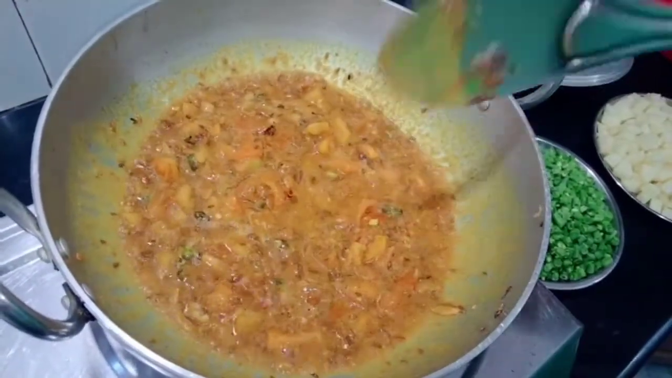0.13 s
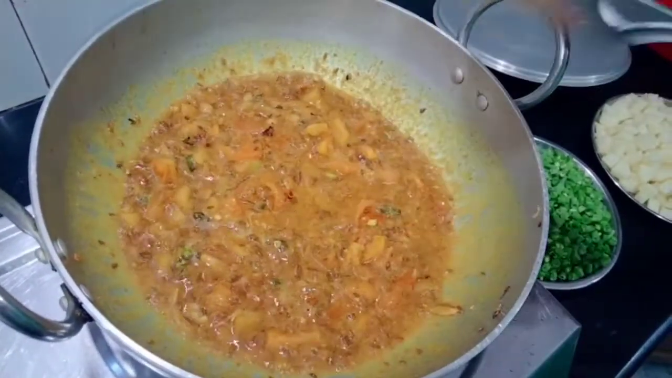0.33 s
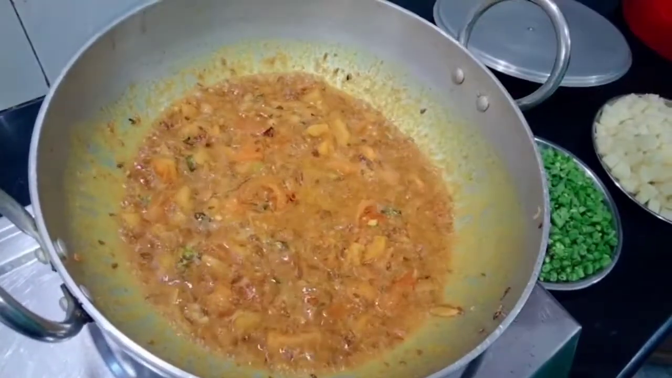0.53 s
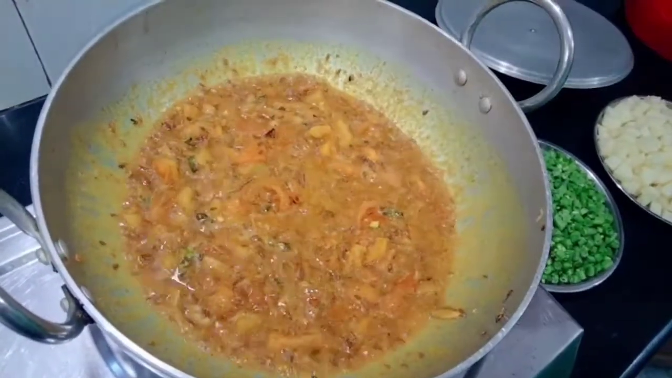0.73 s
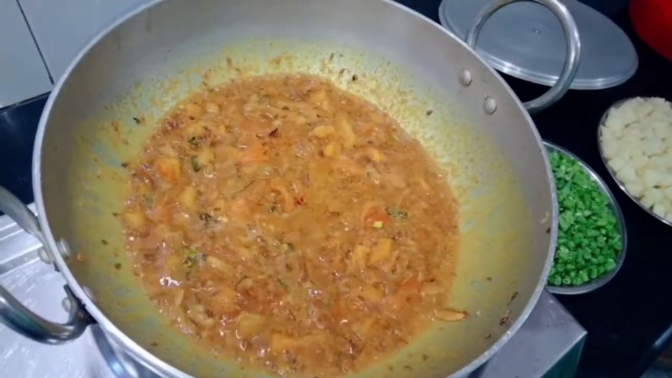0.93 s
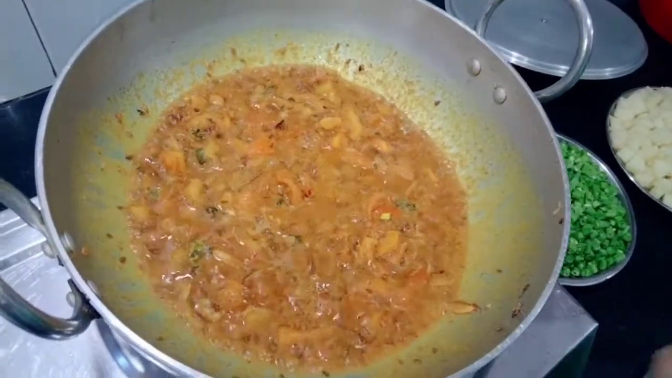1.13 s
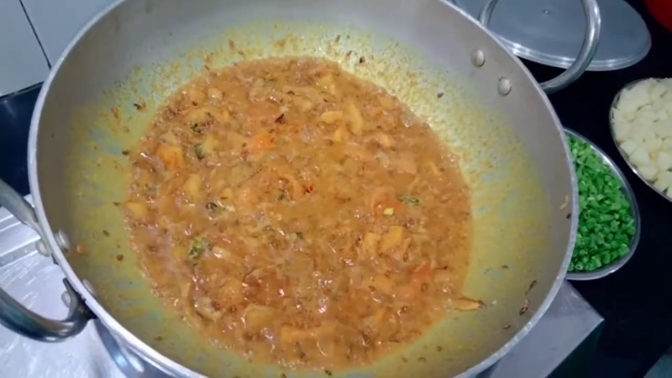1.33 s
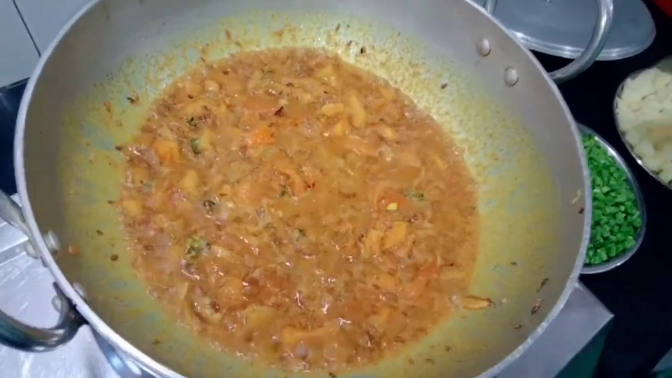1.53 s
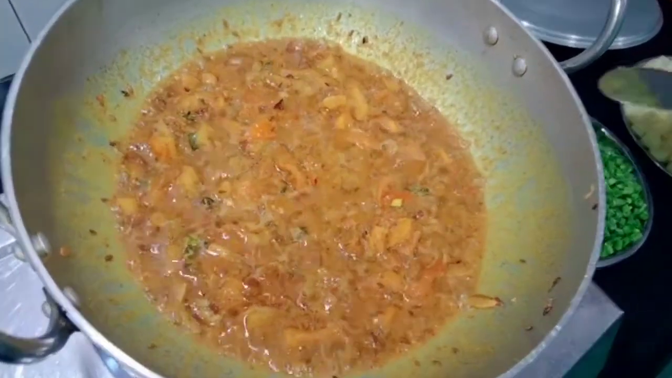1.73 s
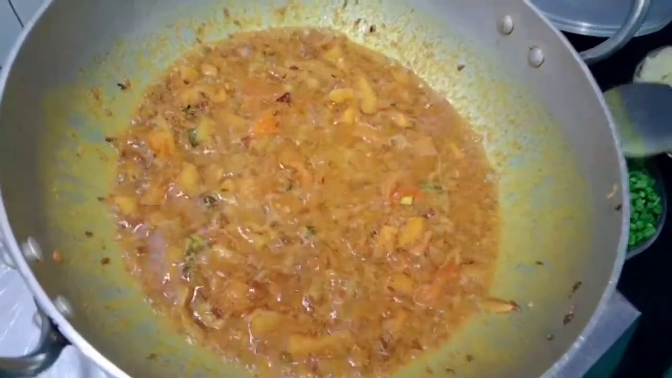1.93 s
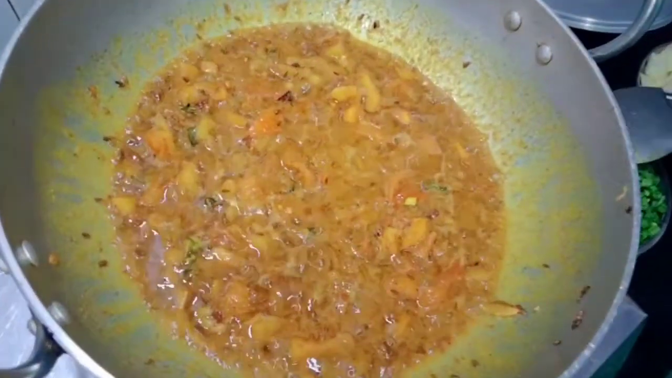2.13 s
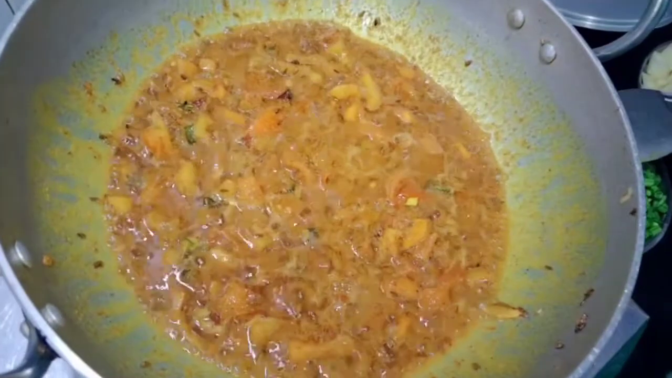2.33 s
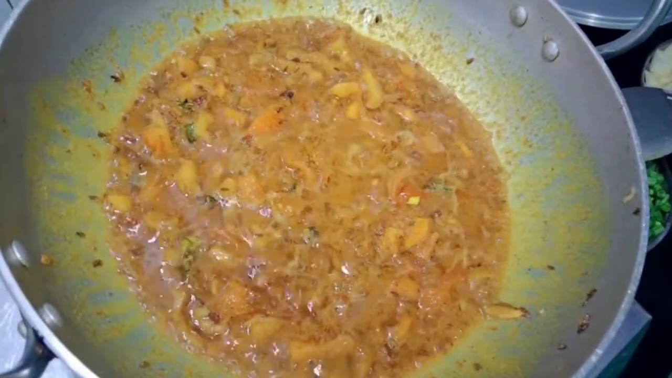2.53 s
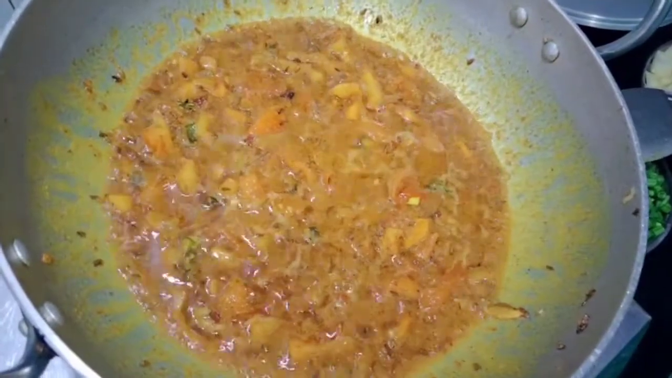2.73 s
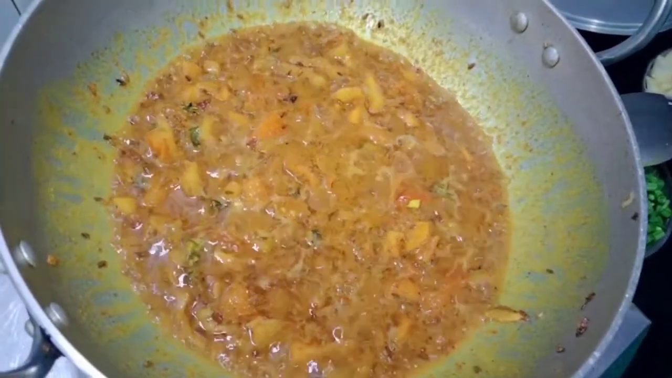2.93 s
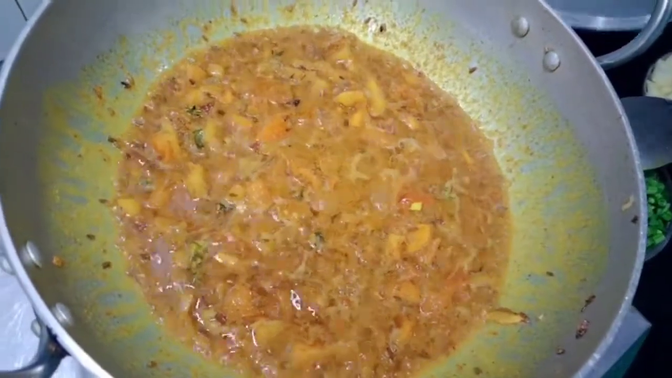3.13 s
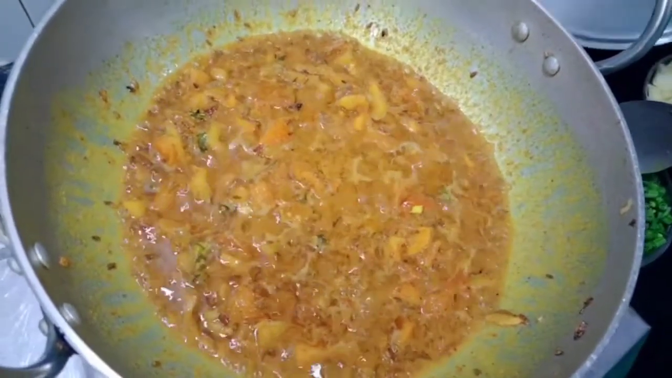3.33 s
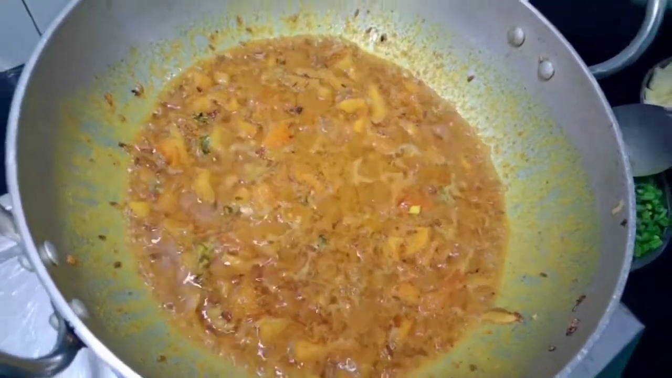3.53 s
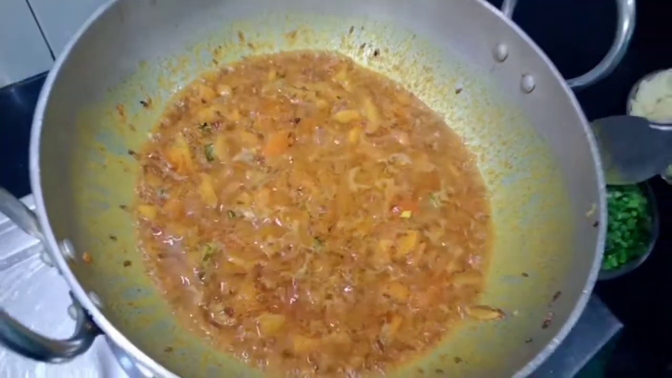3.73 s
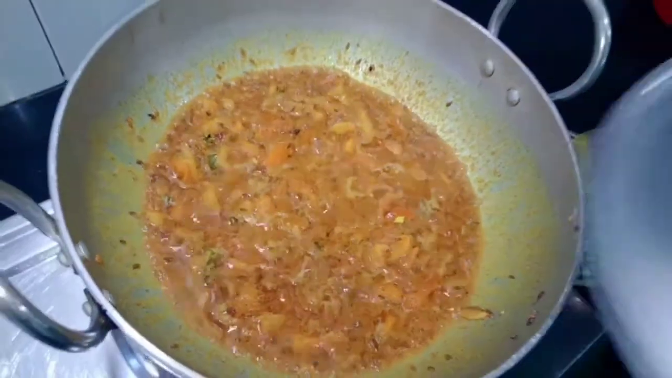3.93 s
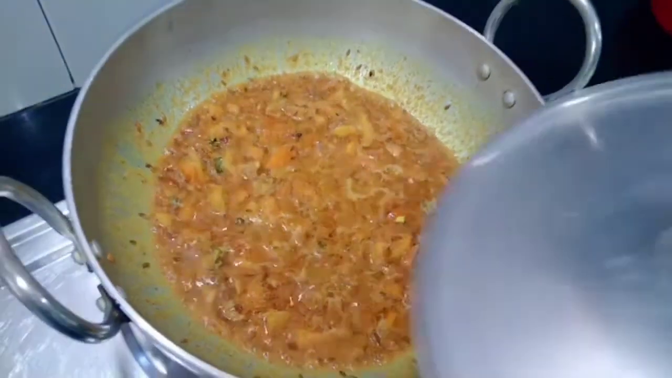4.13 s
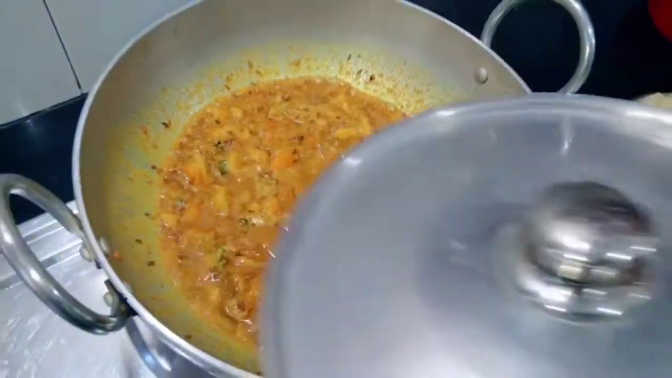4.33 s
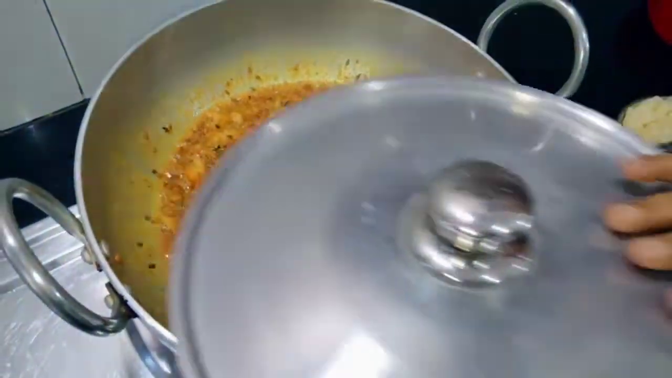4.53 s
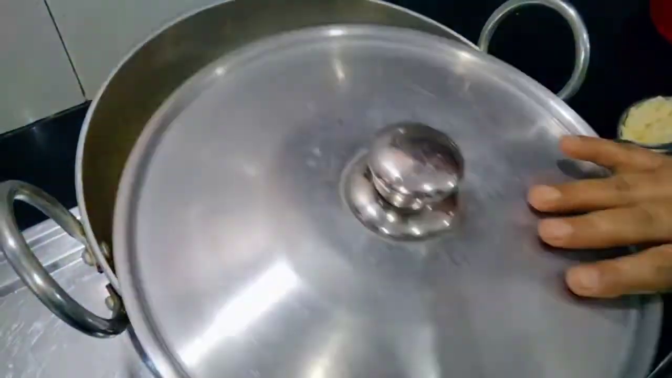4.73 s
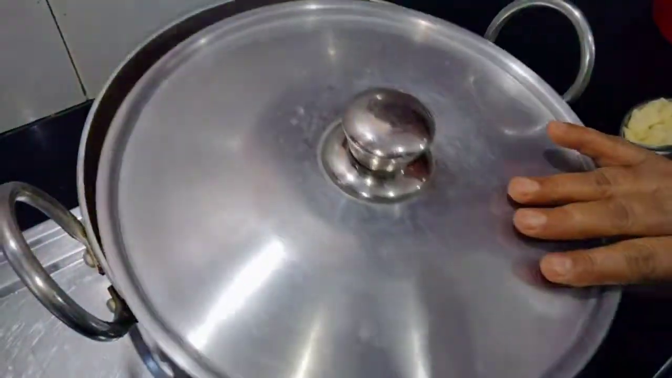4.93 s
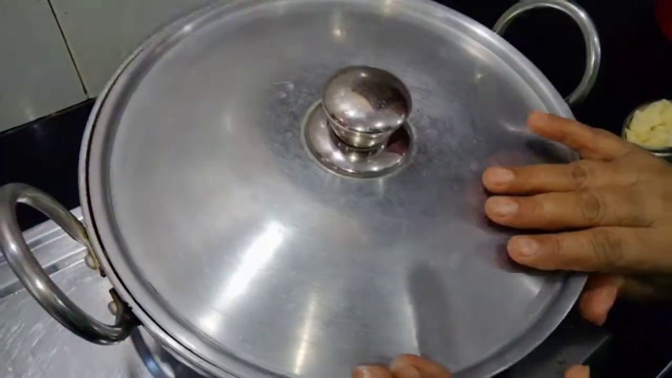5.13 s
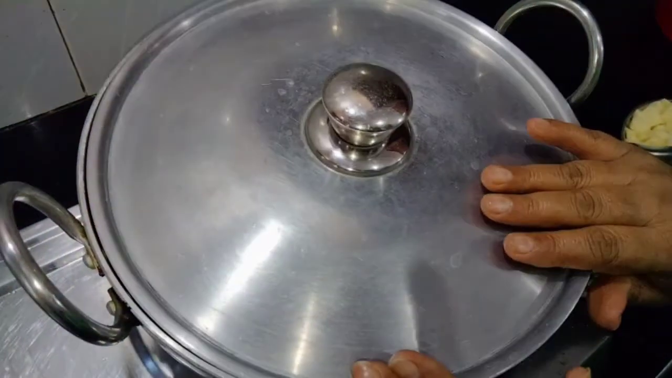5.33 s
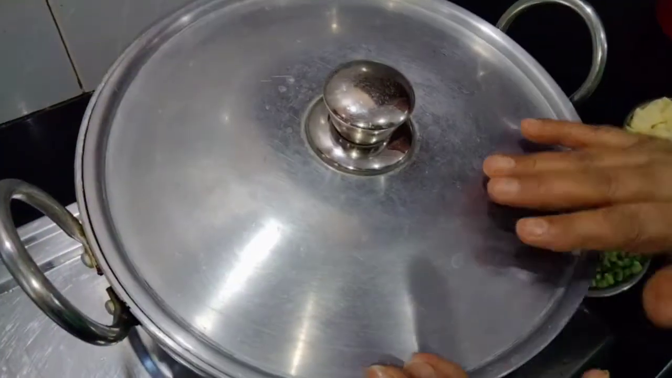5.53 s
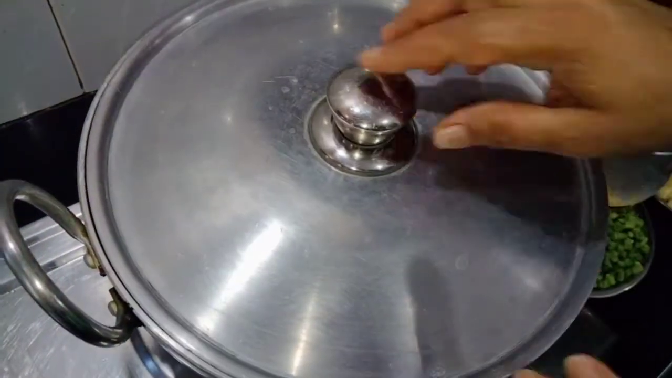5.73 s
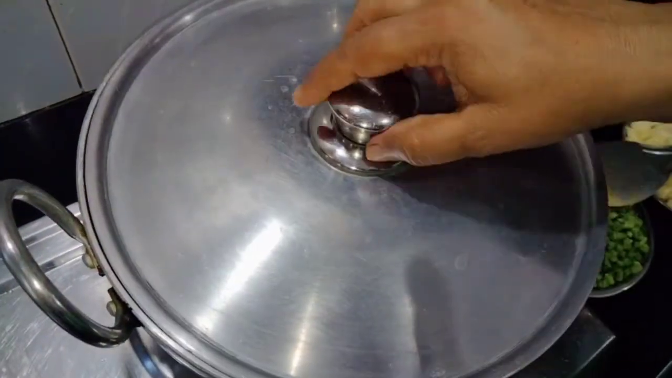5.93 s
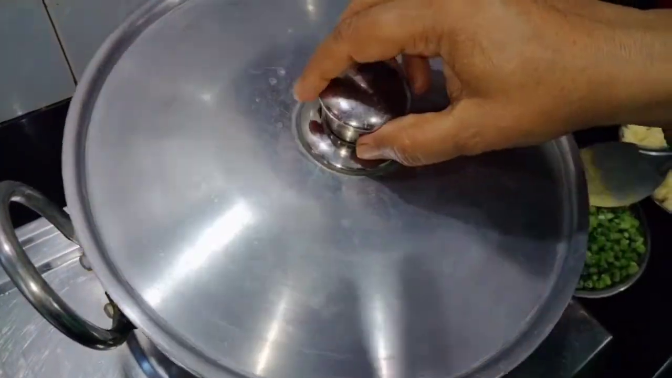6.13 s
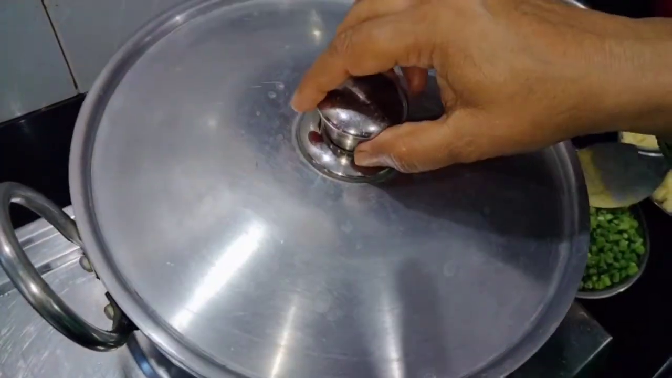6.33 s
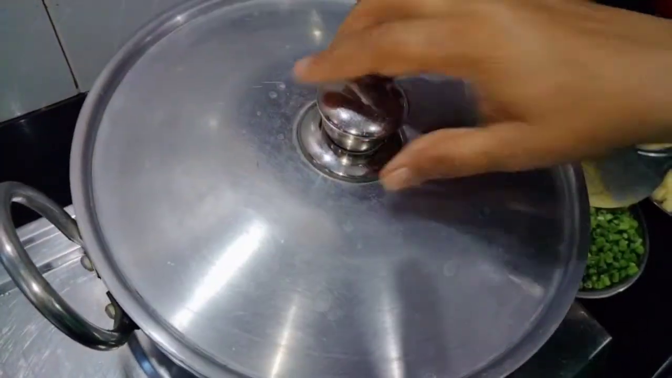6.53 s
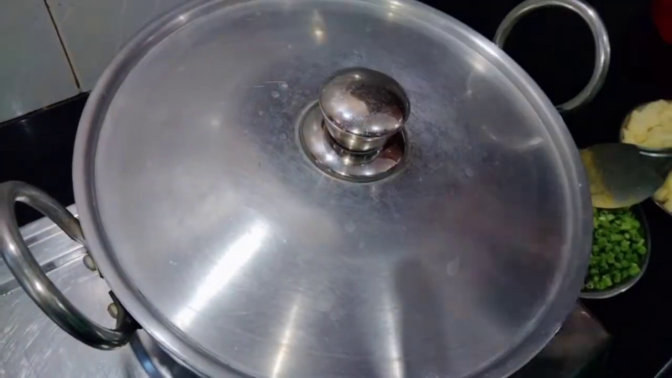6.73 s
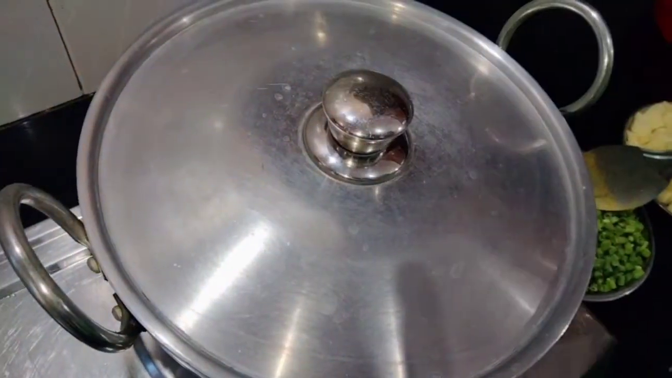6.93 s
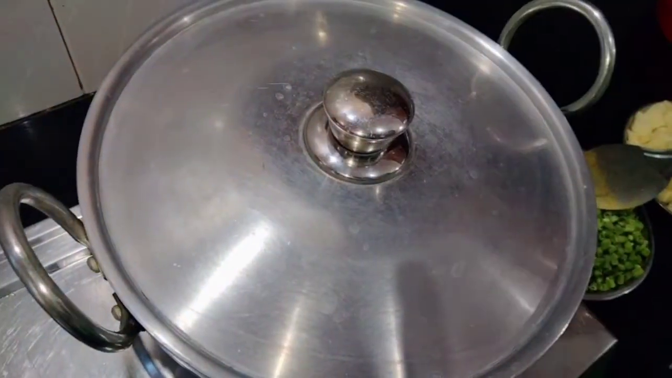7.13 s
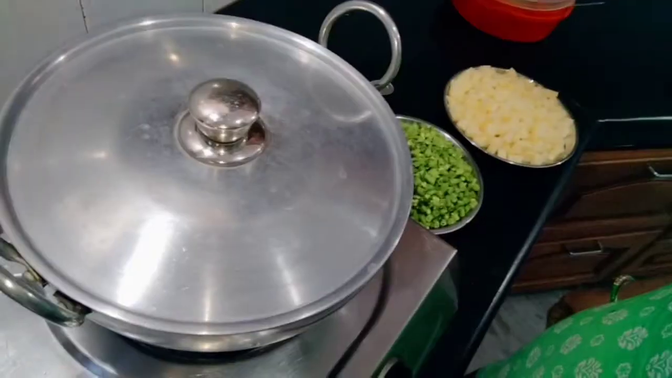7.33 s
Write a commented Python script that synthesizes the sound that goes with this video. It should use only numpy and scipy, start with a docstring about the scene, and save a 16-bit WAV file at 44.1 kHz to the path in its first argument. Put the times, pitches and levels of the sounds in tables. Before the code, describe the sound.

Close, dry kitchen sound: wet masala sizzles brightly in an open steel pan. A spoon clanks and rattles nearby. A metal lid is then picked up in a cluster of clatter and scraping, slides over with a faint hollow hum, and bangs onto the rim. The fizz turns muffled. Small ticks, more nudges and a last bright clank follow, then a short total silence before the soft sizzle returns.

```python
"""Wet spiced masala sizzles in a steel pan; a spoon clanks and rattles, then a lid is dragged over the rim,
dropped, nudged and seated, muffling the fizz. The sound drops out once near the end.
The sizzle is noise roughened by bubble pops and coloured by the lid. Blows and scrapes excite ringing steel
modes over a dense clang; trapped air hums as gliding noise, ticks and tones are fading sines,
and jolts of the microphone are deep filtered noise. Both channels carry the same mono sound."""
import sys
import numpy as np
from scipy import signal
from scipy.io import wavfile
from scipy.ndimage import uniform_filter1d

SR = 44100
rng = np.random.default_rng(int(sys.argv[2]) if len(sys.argv) > 2 else 0)


def unload_audio(sound):
    """Save the sound as a 16-bit wav file, at the path given as the first command line argument."""
    columns = np.transpose(np.atleast_2d(sound))
    # keep every value between -1 and 1, then stretch to whole-number steps
    steps = np.round(np.clip(columns, -1, 1) * 32767)
    wavfile.write(sys.argv[1], SR, steps.astype(np.int16))


N = 325968  # samples

# Fizz colour of the open pan, the lidded pan and the pan from further off.
# Each row: frequency in Hz, relative density in dB per Hz.
OPEN_COLOUR = [(18, -44), (30, -12.5), (93, -14.5), (193, -21), (238, -18.5), (662, -8), (1010, -15),
               (1310, -8.5), (2210, -19), (3940, -10), (5120, -19.5), (7580, -14.5), (9110, 0),
               (10900, -10.5), (15800, -11.5)]
LIDDED_COLOUR = [(20, -9), (120, -9.5), (300, -3), (420, -8), (800, -16.5), (1300, -15), (2000, -23),
                 (2500, -28), (3300, -25), (5400, -25.5), (7500, -19), (9600, -8.5), (11500, -23),
                 (14000, -21), (15600, -20)]
AFAR_COLOUR = [(20, -18), (55, -13), (110, -19.5), (300, -13.5), (735, -13.5), (900, -23), (1200, -9),
               (1890, -14.5), (2200, -24), (3500, -32), (3900, -20), (6000, -29.5), (8900, -10.5),
               (11500, -21), (14000, -27), (15600, -22)]
# Small broad humps and a dip in the open fizz's colour.
# Each row: centre in Hz, width in Hz, height in dB.
OPEN_RIPPLES = [(1780, 120, 4.5), (6370, 2400, 6), (3450, 380, 2.5), (9570, 820, 2.5), (13300, 1900, -3),
                (15300, 1200, 1.5)]
# Resonances of air and steel under the lid. Each row: centre in Hz, width in Hz, height in dB.
DOME_RESONANCES = [(1020, 110, 23.5), (1650, 71, 17.5), (2775, 43, 23.5), (3400, 45, 11.5),
                   (3630, 100, 13.5)]
# How far the lid covers the pan. Each row: time in seconds, share covered from 0 to 1.
LID_COVER = [(3.85, 0.1), (4.2, 0.18), (4.55, 0.42), (4.87, 0.34), (5.1, .9), (5.4, 0.82)]
FIZZ_DB, FIZZ_SAG_DB_PER_S, SHADE_DB = -34.5, -0.31, -14  # open fizz, its slow sag, loss under a shut lid
MUFFLE_POWER = 1.2  # the colour turns muffled later than the level falls
AFAR_S, AFAR_DB = 7.04, 0.5  # from here the pan is heard from further off
# Low body of the fizz: swells from cold to hot, then sinks once lidded.
COLD_DB, HOT_DB, WARM_S, COOL_S, COOL_DB_PER_S = -3.5, 2, 1.7, 4.54, -5
# A band of the fizz stands out early and fades as the pan warms.
WHISTLE_HZ, WHISTLE_WIDTH_HZ, WHISTLE_DB, WHISTLE_FADE_S = 1280, 130, 5.5, 0.59

# Impacts. Each row: start in seconds, boom, body and treble levels in dB, contact length in seconds,
# share of ring the hand leaves, place (0 spoon, 1 dragged, 2 nudged, 3 dropped lid; halves get rounded).
BLOWS = [(2.915, -54, -23, -15, 0.013, 1, 0), (3.853, -28.5, -19.5, -23, 0.0066, 0.25, 1),
         (3.879, -44, -15.5, -25.5, 0.0044, 0.31, 1), (3.897, -34, -23, -37, 0.011, .55, 1.5),
         (4.004, -42, -31, -35, .005, 0.27, 2), (4.029, -42, -14.5, -36.5, 0.0028, 0.15, 1.5),
         (4.067, -42, -25, -44, 0.0046, 0.19, 2), (4.118, -39.5, -26, -40, 0.0043, 0.27, 1.5),
         (4.157, -47, -20, -26, 0.0034, .4, 2), (4.357, -48, -29.5, -50, .004, 0.077, 0.5),
         (4.884, -26.5, -12, -20.5, 0.0052, .34, 3), (4.903, -28.5, -22, -21.5, 0.0066, 0.86, 3),
         (4.946, -32, -24.5, -45, 0.01, 0.9, 3), (4.988, -30, -30.5, -51, .02, 1, 3),
         (5.253, -40, -49, -58.5, 0.0047, 0.68, 3), (5.303, -44.5, -58.5, -65, 0.018, .8, 3),
         (5.769, -41, -37, -59.5, 0.0031, 0.83, 2), (5.863, -30.5, -28.5, -32, 0.0041, 0.34, 2),
         (5.884, -47, -24, -26, 0.0031, 0.66, 2), (6.01, -30.5, -29.5, -35, 0.0055, .34, 2),
         (6.041, -50, -37.5, -28.5, .014, 0.52, 2), (6.11, -36, -24, -21, 0.0078, 0.99, 3),
         (6.115, -43, -24, -13, 0.011, 0.65, 3)]
# Crack over the treble ring. Each entry: level in dB, one per place.
CRACK_DB = [1, 5, -6, 0.7]
# Steel dragging or chattering on steel. Each row: hardest moment in seconds, body level in dB,
# rise in seconds, fall in seconds, treble against body in dB, place (rounded).
STROKES = [(2.97, -21.5, 0.019, 0.043, -6, 0), (3.035, -22.5, 0.051, 0.083, -8, 0),
           (3.23, -33.5, .08, 0.035, -16, 1.5), (4.0, -20.5, 0.074, 0.1, -11.5, 1),
           (4.12, -20, .07, 0.047, -13.5, 1), (4.185, -20.5, .04, 0.096, -12, 1),
           (4.319, -28.5, 0.14, 0.23, -9.5, 1), (4.77, -31, .08, 0.092, -15, 3),
           (4.86, -23, 0.052, 0.014, -15.5, 3), (5.915, -27, .015, 0.061, -12.5, 2.5),
           (6.03, -23.5, 0.021, 0.058, -6.5, 2), (6.08, -24.5, 0.049, .035, -13, 2),
           (6.23, -34, 0.043, .12, -3.5, 3)]
# Ring left in a stroke; the pressing hand damps the dragged lid most. Each entry: share, one per place.
STROKE_RING = [0.63, 0.42, .66, 0.63]
# Boom of a stroke against its body. Each entry: level in dB, one per place.
STROKE_BOOM_DB = [-26.5, -16, -12.5, -15]
# Clear modes of the steel. Each entry: frequency in Hz.
STEEL_HZ = [258, 307, 392, 610, 727, 867, 1065, 1195, 1233, 1365, 1420, 1664, 1765, 1998, 2322, 2800, 3058,
            3340, 3966, 4143, 4425, 4995, 5045, 5910, 6865, 7880, 8670, 8963, 9440, 10145]
# Strength of those modes. Each row: level in dB under the spoon, the dragged lid, the nudged lid
# and the dropped lid, then undamped t60 in seconds.
STEEL_MODES = [(-37, -23, -21.5, -13.5, 0.49), (-42, -34, -23.5, -10, 0.4), (-50, -33.5, -10.5, -3.5, 0.14),
               (-17, -18.5, -35, -27.5, 0.9), (-7, -11.5, -33, -12, 0.38), (-1.5, -21, -5.5, -23.5, 0.14),
               (-10, -11, -10, -3, 0.26), (-19.5, -0.5, -4, -15, 0.34), (-17, 9, -21, -19.5, 0.094),
               (-16.5, -4.5, 0.5, -12, 0.36), (-36, -2.5, -14.5, -14, 0.68), (-12.5, -13, -14, -16.5, 0.92),
               (-4, 1.5, -1.5, -6.5, 0.26), (-1, -14, -15.5, -19.5, 0.55), (-21.5, -28, -17, -23, 0.63),
               (-33.5, -18, -10.5, -9, 0.18), (-11, -8.5, -14.5, -21, 0.66), (-24, -3.5, -11.5, -6, 0.17),
               (-22, -9, -7.5, -4.5, 0.21), (1.5, -16.5, -7, -30, 0.28), (-22, -13, -21, -14.5, 0.39),
               (-9.5, -16, -21, -24, 0.6), (-27.5, -15.5, -21, -19, 0.21), (-8, -6.5, -4, -5, 0.13),
               (1, -13, -1, -3, .13), (0, -10, -3.5, -11.5, 0.34), (-16.5, -25.5, -22.5, -2.5, 0.26),
               (-4, -7, 1, -2, 0.18), (1.5, -1.5, -19, -7, 0.22), (-5, -15.5, -7, -2, 0.22)]
# Countless weak modes. Each row: frequency in Hz, relative density in dB per Hz.
CLANG_COLOUR = [(88, -52), (150, -19.5), (390, -31.5), (522, -14.5), (741, -11), (883, -15.5), (1180, 2.5),
                (1550, -25.5), (1780, -12), (2630, -25), (4040, -8.5), (5410, -12.5), (7390, -10.5),
                (8980, -0.5), (15800, -24.5)]
# Undamped decay of the weak modes. Each row: frequency in Hz, t60 in seconds.
CLANG_T60 = [(200, 0.5), (1000, 0.53), (3000, 0.77), (8000, 0.44), (16000, 0.33)]
# Dense clang against the clear modes. Each row, one per place: boom, body and treble in dB.
CLANG_DB = [(-4, 2, -9), (-7.5, 3, 4), (-1, -8, -7), (-4.5, 1, -2.5)]
SPLIT_HZ = 450, 2400  # valleys between boom, body and treble
SWELL_DB = 12  # a stroke or jolt is this much weaker one rise before and one fall after its top

# Air under the sliding lid hums on two pitches; the upper climbs as the lid lifts, then comes back down.
# Each row: time in seconds, upper pitch in Hz, lower pitch in Hz, upper level in dB, lower level in dB.
CAVITY_HUM = [(4.2, 590.5, 530, -51, -57), (4.318, 640, 500, -32.5, -46), (4.47, 731, 485, -40, -45),
              (4.629, 928, 465, -48, -49.5), (4.73, 770, 450, -46, -53), (4.86, 611, 410, -36, -35),
              (4.94, 592, 390, -44, -34)]
# Tiny bright ticks. Each row: start in seconds, level in dB, frequency in Hz, t60 in seconds.
TICKS = [(5.674, -16.5, 8960, 0.011), (5.7019, -29, 8650, 0.012), (6.3327, -23.5, 8700, 0.022),
         (6.344, -18, 8650, 0.0094)]
# Tones left singing when the hand lets go.
# Each row: start in seconds, frequency in Hz, level in dB, t60 in seconds.
SINGING = [(6.19, 3690, -35.5, 1.1), (6.25, 1421, -61, 0.63), (6.3, 599, -38.5, 0.57)]
# Hands jolt the microphone.
# Each row: hardest moment in seconds, level in dB, rise in seconds, fall in seconds.
JOLTS = [(3.84, -34.5, 0.07, 0.17), (4.05, -37, 0.1, .035), (4.18, -49, .04, 0.28), (4.85, -52, 0.13, .06),
         (6.11, -43, .03, .04), (7.12, -57, 0.018, .02), (7.39, -56, .15, .1)]
DROPOUT_START_S, DROPOUT_END_S, EDGE_HZ = 6.8995, 7.0315, 15760  # the silence, then the band limit


def sizzle():
    """Thousands of steam bubbles burst each second; the lid slides the colour from open to muffled."""
    pops = gain_of(1.2 * np.minimum(rng.exponential(1, N), 5)) * (rng.random(N) < 3000 / SR)
    roughness = evened(uniform_filter1d(pops, size=12))
    drive = rng.standard_normal(N) * (1 + 0.5 * roughness)
    hz, t, spectrum = signal.stft(drive, SR, nperseg=1024, noverlap=768)
    lid = np.clip(follow(LID_COVER, t)[0], 0, 1)
    afar = np.clip((t - AFAR_S) / 0.075, 0, 1)
    level_db = FIZZ_DB + FIZZ_SAG_DB_PER_S * t + SHADE_DB * lid + AFAR_DB * afar
    colour_db = pan_colour(hz, t, lid ** MUFFLE_POWER + afar)
    # small patches of time and frequency flicker
    patches = uniform_filter1d(rng.standard_normal(spectrum.shape), size=14, axis=0)
    patches = evened(uniform_filter1d(patches, size=8, axis=1))
    spectrum *= gain_of(colour_db + level_db + 1.23 * patches) / np.sqrt(np.mean(drive ** 2))
    return signal.istft(spectrum, SR, nperseg=1024, noverlap=768)[1][:N]


def pan_colour(hz, t, cover):
    """Fizz spectrum in dB, sliding between open (cover 0), lidded (1) and far off (2)."""
    colours = [read(OPEN_COLOUR, hz) + bumps(OPEN_RIPPLES, hz),
               read(LIDDED_COLOUR, hz) + bumps(DOME_RESONANCES, hz),
               read(AFAR_COLOUR, hz)]
    fizz = (hz > 6000) & (hz < 15000)  # every colour is levelled to the same power here
    colour_db = 0
    for k, db in enumerate(colours):
        db = db - 10 * np.log10(np.sum(gain_of(2 * db[fizz])) / len(hz))
        colour_db = colour_db + db[:, None] * np.clip(1 - abs(cover - k), 0, 1)
    simmer_db = np.interp(t, [0, WARM_S], [COLD_DB, HOT_DB])
    simmer_db = simmer_db + COOL_DB_PER_S * np.maximum(t - COOL_S, 0)
    log_offset = np.log(hz + 1)[:, None] - np.log(600)  # distance from 600 Hz in natural log units
    colour_db += simmer_db / (1 + log_offset ** 2 / 0.49)
    whistle = bumps([(WHISTLE_HZ, WHISTLE_WIDTH_HZ, WHISTLE_DB)], hz)
    return colour_db + whistle[:, None] * np.exp(-(t / WHISTLE_FADE_S) ** 2)


def blows():
    """The ring builds up while the contact lasts; a short crack sits on top."""
    out = np.zeros(N)
    for s, *ring_db, contact_s, ring, place in BLOWS:
        place = round(place)
        answer = steel(ring, place)
        rise = np.minimum(np.arange(len(answer[0])) / (max(contact_s, 0.001) * SR), 1)
        for db, band in zip(ring_db, answer):
            add(out, s, gain_of(db) * band * rise / np.sqrt(np.mean(band[:800] ** 2)))
        crack = clang(lambda hz: 3.2 * contact_s + 0 * hz, count=8192)  # same t60 at every frequency
        crack *= np.minimum(2 * rise[:len(crack)], 1)
        crack /= np.sqrt(np.mean(crack[:600] ** 2))
        add(out, s, gain_of(ring_db[-1] + CRACK_DB[place]) * crack)
    return out


def scrapes():
    """Uneven slips, a few of them large, keep feeding the same modes while steel slides on steel."""
    out = np.zeros(N)
    for top, db, rise, fall, treble_db, place in STROKES:
        place = round(place)
        t = np.arange(top - 2 * rise, top + 2 * fall, 1 / SR)
        slips = gain_of(3.5 * np.minimum(rng.exponential(1, len(t)), 3))
        slips *= rng.random(len(t)) < 800 / SR  # about 800 slips a second
        friction = evened((slips + 0.13) * rng.standard_normal(len(t)))
        friction *= swell(t, top, db, rise, fall)
        balance_db = STROKE_BOOM_DB[place], 0, treble_db
        answer = steel(STROKE_RING[place], place)
        answer = sum(gain_of(db) * band / np.linalg.norm(band) for db, band in zip(balance_db, answer))
        add(out, t[0], signal.fftconvolve(friction, answer))
    return out


def steel(ring, place):
    """Answer of the steel to one click, in three bands: clear modes over the dense clang."""
    t = np.arange(SR * 2 // 3) / SR
    *place_db, t60 = np.transpose(STEEL_MODES)[:, :, None]
    phase, spread, split = rng.random((3, len(STEEL_MODES), 1))
    mode_db = place_db[place] + 2.0 * (spread - 0.5) - 60 * t / (t60 * max(ring, 0.05))
    turns = np.c_[STEEL_HZ] * t + phase
    # round steel rings in close pairs
    twin = np.sin(2 * np.pi * (1 + 0.011 * (split - 0.5)) * turns)
    pairs = np.sin(2 * np.pi * turns) + 0.5 * twin
    modes = (gain_of(mode_db) * pairs).sum(0)
    dense = clang(lambda hz: read(CLANG_T60, hz) * ring, len(t))
    return [evened(clear) + gain_of(db) * evened(weak)
            for clear, weak, db in zip(bands(modes), bands(dense), CLANG_DB[place])]


def clang(t60, count):
    """Dense noisy ring of countless weak modes, dying band by band."""
    hz, t, spectrum = signal.stft(rng.standard_normal(count), SR, nperseg=256)
    decay_db = 60 * t / np.maximum(t60(hz), 0.005)[:, None]
    spectrum *= gain_of(read(CLANG_COLOUR, hz)[:, None] - decay_db)
    return signal.istft(spectrum, SR, nperseg=256)[1][:count]


def cavity():
    """Slow noise carried on each gliding pitch of the trapped air gives a fuzzy hum."""
    out = np.zeros(N)
    t = np.arange(CAVITY_HUM[0][0], CAVITY_HUM[-1][0], 1 / SR)
    upper, lower, upper_db, lower_db = follow(CAVITY_HUM, t)
    slow = signal.butter(2, 30, fs=SR, output="sos")
    for hz, db in (upper, upper_db), (lower, lower_db):
        a, b = signal.sosfilt(slow, rng.standard_normal((2, len(t))))
        carrier = np.exp(2j * np.pi * np.cumsum(hz) / SR)
        add(out, t[0], gain_of(db) * evened(((a + 1j * b) * carrier).real))
    return out


def tones():
    """Ticks die within hundredths of a second; singing modes swell softly and fade within half a second."""
    out, t = np.zeros(N), np.arange(SR // 2) / SR
    for s, db, hz, t60 in TICKS:
        turn = 2 * np.pi * hz * t
        partials = np.sin(turn) + 0.77 * np.sin(1.074 * turn) + 0.4 * np.sin(1.5 * turn)
        add(out, s, gain_of(db - 60 * t / t60) * partials * (1 - np.exp(-t / 0.00055)) ** 2)
    for s, hz, db, t60 in SINGING:
        shape = (1 - np.exp(-t / 0.058)) * np.cos(np.pi * t)  # soft onset, closes to silence
        add(out, s, gain_of(db - 60 * t / t60) * np.sin(2 * np.pi * hz * t) * shape)
    return out


def jolts():
    """Lumpy deep rumble through the microphone's housing."""
    rumble_band = signal.butter(2, [16, 65], "band", fs=SR, output="sos")
    deep = evened(signal.sosfilt(rumble_band, rng.standard_normal(N)))
    t = np.arange(N) / SR
    return deep * sum(swell(t, *row) for row in JOLTS)


def swell(t, top, db, rise, fall):
    """Gain that climbs to a top and sinks again, in straight lines of dB."""
    return gain_of(db - SWELL_DB * np.maximum((top - t) / rise, (t - top) / fall))


def bands(x):
    """Split a sound into boom, body and treble."""
    boom = signal.sosfilt(signal.butter(4, SPLIT_HZ[0], "low", fs=SR, output="sos"), x)
    body = signal.sosfilt(signal.butter(3, SPLIT_HZ, "band", fs=SR, output="sos"), x)
    treble = signal.sosfilt(signal.butter(4, SPLIT_HZ[1], "high", fs=SR, output="sos"), x)
    return boom, body, treble


def bumps(rows, hz):
    """Sum in dB of resonance-shaped bumps."""
    return sum(db / (1 + (2 * (hz - centre) / width) ** 2) for centre, width, db in rows)


def gain_of(db):
    """Amplitude factor of a level in dB."""
    return 10 ** (np.asarray(db) / 20)


def evened(x):
    """Scale to an RMS of one."""
    return x / np.sqrt(np.mean(x ** 2) + 1e-20)


def read(points, hz):
    """Read a curve along log frequency."""
    f, value = np.transpose(points)
    return np.interp(np.log(hz + 1), np.log(f + 1), value)


def follow(rows, t):
    """Glide each column of a timed table through the times t."""
    s, *columns = np.transpose(rows)
    return [np.interp(t, s, column) for column in columns]


def add(mix, s, sound):
    """Lay a sound into the mix at s seconds, cut at the end of the mix."""
    part = mix[round(s * SR):][:len(sound)]
    part += sound[:len(part)]


def scene():
    """Sum every layer and copy the mono mix to two channels."""
    return np.tile(sizzle() + blows() + scrapes() + cavity() + tones() + jolts(), (2, 1))


def record(dry):
    """Hard limit at full scale, a brief silence, then the band limit."""
    t = np.arange(N) / SR
    on = np.clip(np.maximum(DROPOUT_START_S - t, t - DROPOUT_END_S) / 0.0041, 0, 1)
    low_pass = signal.firwin(1535, EDGE_HZ, window=("kaiser", 9), fs=SR)
    return signal.oaconvolve(np.clip(dry, -1, 1) * on, low_pass[None], "same")


dry = scene()
out = record(dry)
unload_audio(out)
```